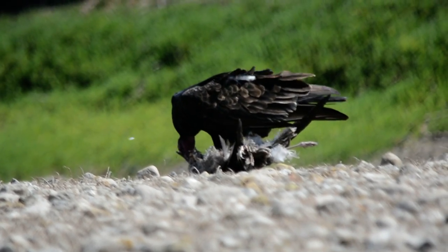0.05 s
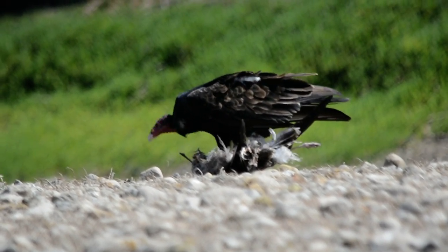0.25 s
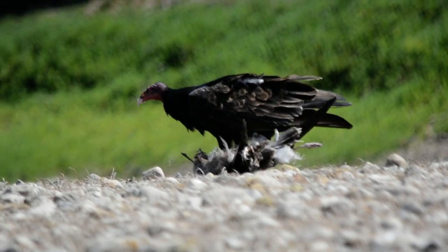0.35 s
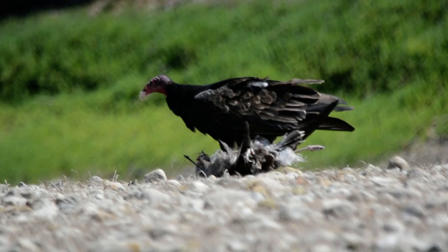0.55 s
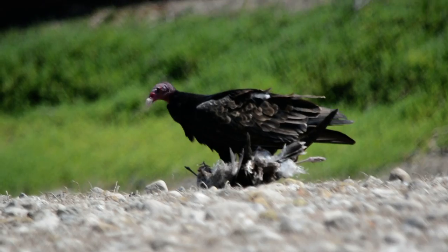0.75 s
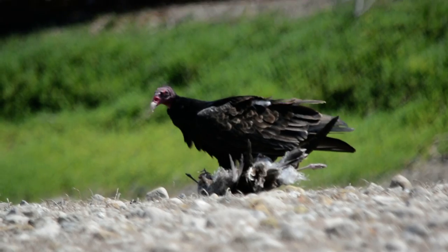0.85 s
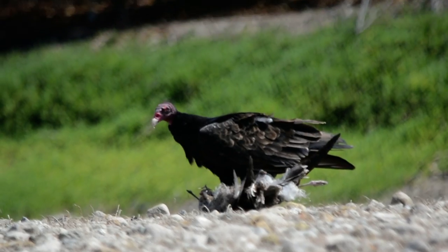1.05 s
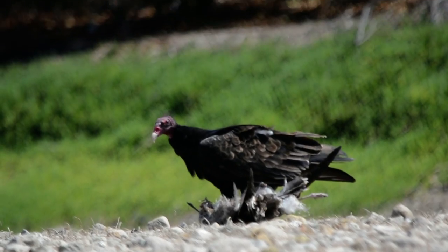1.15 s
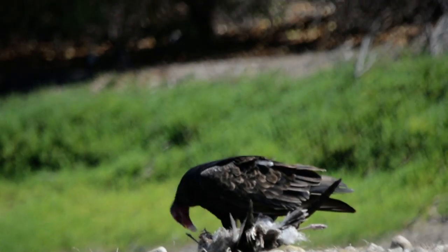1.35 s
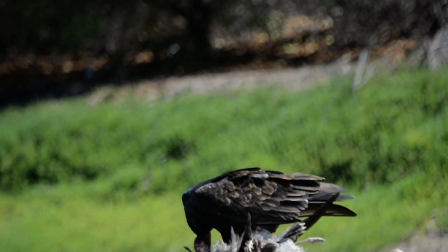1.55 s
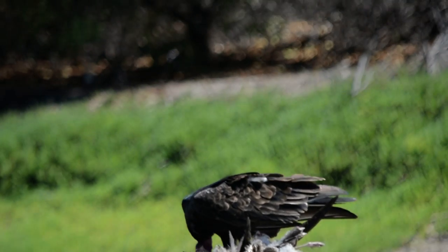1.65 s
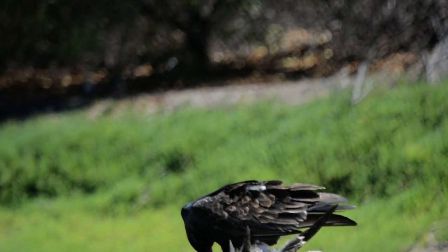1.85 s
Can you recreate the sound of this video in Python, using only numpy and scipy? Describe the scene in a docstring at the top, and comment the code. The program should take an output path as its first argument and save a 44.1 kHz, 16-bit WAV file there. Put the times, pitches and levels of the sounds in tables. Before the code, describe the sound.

Outdoors in the open, a nearby bird squawks harshly as a light gust brushes the microphone. After a pause it lets out a high whistling squeal that cracks twice and grows louder, over a steady rumble of wind or surf.

```python
"""A bird near the microphone gives one harsh rattling squawk, then a long thin squeal, outdoors by water.
The squawk is uneven membrane pulses ringing throat and bill. The squeal is a wavering whistle that
cracks twice into two voices, swells, and closes with a few rasping pulses and a faint after-whistle.
Open ground returns a faint tail, a far bank echoes the squawk. Distant surf or wind rumbles
underneath, and a gust brushes the microphone at first."""
import sys
import numpy as np
from scipy import signal
from scipy.fft import rfft, irfft
from scipy.io import wavfile
from scipy.ndimage import uniform_filter1d

SR = 44100
rng = np.random.default_rng(int(sys.argv[2]) if len(sys.argv) > 2 else 0)


def materialize(psi):
    """Save the field psi as 16-bit PCM at rate SR to the path in sys.argv[1].

    A 1-D psi becomes a single channel; in a 2-D psi each row is a channel.
    """
    bounded = np.clip(np.atleast_2d(psi).T, -1, 1)
    quanta = np.round(bounded * 32767).astype(np.int16)
    wavfile.write(sys.argv[1], SR, quanta)


N = 83790
T = np.arange(N) / SR

# Rumble spectrum: freq_hz, relative_db
RUMBLE_SPECTRUM = [(25, -33), (40, -36), (60, -11), (105, -4.5), (200, -1.5), (330, -2), (490, -5),
                   (800, 0), (1150, -4.5), (1600, -9.5), (2000, -17), (2600, -21), (4000, -30), (5500, -37),
                   (8000, -42), (12000, -49), (15500, -59)]
# Rumble stereo width: freq_hz, side_to_mid_db
RUMBLE_WIDTH = [(30, -45.5), (130, -55), (260, -33), (480, -21.5), (950, -21.5), (1900, -12.5),
                (3800, -6.5), (7500, -2.5), (15000, -2)]
# Gust envelope: time_s, level_db
GUST_LEVEL = [(0, -59), (.045, -43), (.068, -50), (.097, -32.5), (.13, -42), (.16, -50), (.185, -39),
              (.22, -59), (.44, -55), (.5, -83)]
# Outdoor tail decay: freq_hz, t60_s
TAIL_DECAY = [(500, .8), (2000, 1), (4000, 1), (8000, 0.35), (14000, 0.37)]
# Fixed response of throat and bill: freq_hz, relative_db
THROAT_RESPONSE = [(200, -52), (800, -23), (1250, -13), (1600, 0.5), (2000, 3.5), (2420, 1.5), (2780, 0.5),
                   (3020, -13.5), (3240, -2), (3480, -15), (3700, -6), (4100, -7), (4560, -10.5),
                   (5000, -26.5), (6000, -28.5), (7000, -31), (7400, -32), (8400, -26), (9300, -35),
                   (10700, -33.5), (12000, -40), (12800, -48), (15500, -57)]
# Squawk envelope: time_s, level_db
SQUAWK_LEVEL = [(.145, -66), (0.166, -40.5), (.182, -32), (.21, -29.5), (.25, -25.5), (.3, -26),
                (.345, -26), (.375, -21.5), (.41, -17.5), (.44, -17), (0.479, -22.5), (.495, -27.5),
                (.512, -46)]
# Membrane rate and moving throat resonance: time_s, rate_hz, resonance_hz, gain_db
SQUAWK_GLIDE = [(.15, 184, 2460, -9), (.3, 171.3, 2480, -8), (.36, 172, 2020, -6), (.41, 205, 2070, -5),
                (.45, 230, 1790, 3.5), (.51, 200, 1620, 6.5)]
# Squawk roughness: time_s, strong_weak_swing_db, added_hiss_and_flap_db
SQUAWK_ROUGHNESS = [(.15, 2, -4), (.215, 3.5, -4), (.25, .5, -1), (.28, 0.5, -0.5), (.32, 1, 6.5),
                    (.35, 0, -2.5), (.385, 0.5, 5.5), (.43, -0.5, 7.5), (.47, 0, 2), (.51, 2, 0)]
# Bill resonance, sinking as the bill closes: time_s, lowest_mode_hz, gain_db
BILL_GLIDE = [(.15, 6700, 5), (.255, 6060, 5.5), (.33, 7250, -5), (.395, 6600, -1), (.42, 5650, 1.5),
              (.45, 5100, -5), (.51, 4800, -11)]
# Bill modes: ratio_to_lowest, gain_db
BILL_RESONANCES = [(1, -1.5), (1.5, -4), (2.06, -6)]
# Squeal melody: time_s, pitch_hz
SQUEAL_PITCH = [(.9, 2620), (.96, 2830), (.98, 3020), (.991, 2990), (1.01, 3170), (1.06, 3225),
                (1.115, 3020), (1.135, 3135), (1.172, 3130), (1.195, 2840), (1.22, 3200), (1.27, 3160),
                (1.306, 3410), (1.32, 3850), (1.35, 3760), (1.37, 3560), (1.378, 3300), (1.403, 3290),
                (1.42, 3210), (1.437, 3300), (1.48, 3180), (1.515, 3410), (1.54, 3490), (1.548, 3760),
                (1.56, 3740), (1.569, 3390), (1.583, 3375), (1.598, 3435), (1.625, 3350), (1.641, 3240),
                (1.656, 2880)]
# Squeal harmonics: time_s, first_db, second_db, third_db
SQUEAL_LEVELS = [(0.897, -54, -85, -98), (0.916, -45.5, -73, -90), (.96, -42, -71, -70),
                 (.993, -44.5, -61, -60), (1.012, -42, -47.5, -53.5), (1.06, -41.5, -44.5, -52.5),
                 (1.105, -42.5, -54.5, -58), (1.145, -43.5, -50.5, -57), (1.193, -43.5, -57, -59.5),
                 (1.22, -45.5, -47.5, -55), (1.3, -43, -58.5, -61), (1.385, -39.5, -53, -68),
                 (1.44, -40.5, -54.5, -72), (1.48, -39.5, -51.5, -59), (1.53, -40.5, -51.5, -77),
                 (1.563, -30, -45, -60), (1.572, -31.5, -36.5, -49.5), (1.6, -26.5, -32.5, -39.5),
                 (1.628, -26.5, -32, -46), (1.642, -29.5, -35, -51), (1.658, -43, -60, -79)]
# Second voice in each crack: start_s, end_s, top_hz, level_db, roughness
VOICE_CRACKS = [(1.316, 1.373, 4284, -44.5, .12), (1.543, 1.564, 4420, -44.5, 0.65)]
# Closing flaps: start_s, level_db
CLOSING_FLAPS = [(1.6563, -28), (1.6634, -32), (1.669, -36.5)]
# After-whistle: time_s, pitch_hz, level_db
AFTER_WHISTLE = [(1.665, 3320, -72), (1.705, 3195, -55), (1.755, 3200, -63), (1.785, 3490, -58),
                 (1.81, 3400, -62), (1.855, 3400, -60), (1.9, 3290, -56)]


def amp(db):
    """Decibels to gain."""
    return 10 ** (np.asarray(db) / 20)


def unit_rms(x):
    """Scale to rms 1."""
    return x / np.sqrt(np.mean(x ** 2) + 1e-20)


def at_freq(table, hz):
    """Interpolate a table over log frequency."""
    freq_hz, value = np.transpose(table)
    return np.interp(np.log(hz + 1), np.log(freq_hz + 1), value)


def curves(table):
    """Columns of a time table, per sample."""
    time_s, *columns = np.transpose(table)
    return [np.interp(T, time_s, column) for column in columns]


def gate(start_s, end_s, edge_s=.0034):
    """Gate with linear edges."""
    return np.clip(np.minimum(T - start_s, end_s - T) / edge_s + .5, 0, 1)


def wander(corner_hz):
    """Low-passed noise, rms 1."""
    hz = np.fft.rfftfreq(N, 1 / SR)
    return unit_rms(irfft(rfft(rng.standard_normal(N)) / (1 + (hz / corner_hz) ** 2), N))


def resonate(x, hz, width_hz):
    """Moving resonance, unity gain."""
    carrier = np.exp(2j * np.pi * np.cumsum(hz) / SR)
    pole = np.exp(-np.pi * width_hz / SR)
    return 2 * (carrier * signal.lfilter([1 - pole], [1, -pole], x / carrier + 1e-18)).real


def resonate_twice(x, hz, width_hz):
    """Cascaded resonance, steeper skirts."""
    return resonate(resonate(x, hz, width_hz), hz, width_hz)


def rumble(level_db=-36.5, pan_db=.5, patch_db=.3):
    """Distant surf or wind: dark noise with faint drifting patches, narrow in the bass, wider on top."""
    frames, hz = N // 512 + 6, np.fft.rfftfreq(2048, 1 / SR)
    mid_re, mid_im, side_re, side_im, patches = rng.standard_normal((frames, len(hz), 5)).T
    patches = uniform_filter1d(patches, size=14, axis=0)
    patches = unit_rms(uniform_filter1d(patches, size=8, axis=1))
    mid = mid_re + 1j * mid_im
    side = (side_re + 1j * side_im) * amp(at_freq(RUMBLE_WIDTH, hz))[:, None]
    shape_db = at_freq(RUMBLE_SPECTRUM, hz)[:, None] + patch_db * patches
    spectra = np.array([mid + side, mid - side]) * amp(shape_db)
    noise = unit_rms(signal.istft(spectra, nperseg=2048, noverlap=1536)[1][:, :N])
    return noise * amp(level_db + pan_db * np.array([[.5], [-.5]]))


def gust(band_hz=(70, 187), right_db=-15):
    """Wind buffets each microphone port independently, mostly the left."""
    level_db, = curves(GUST_LEVEL)
    band = signal.butter(2, band_hz, "bandpass", fs=SR, output="sos")
    buffet = signal.sosfilt(band, rng.standard_normal((2, N)))
    power = uniform_filter1d(buffet ** 2, size=1500, axis=1)
    return buffet / np.sqrt(power + 1e-9) * amp(level_db) * amp([[0], [right_db]])


def far_echo(x, delay_s=.385, smear_s=.024, gain_db=-27, centre_hz=1890):
    """Dull, smeared return from a far bank."""
    t = T[:SR]
    scatter = rng.standard_normal(SR) * (t > delay_s) * np.exp(-abs(t - delay_s) / smear_s)
    echo = signal.fftconvolve(x, scatter / np.linalg.norm(scatter))[:N]
    return amp(gain_db) * resonate(echo, np.full(N, centre_hz), width_hz=700)


def outdoors(x, ground_db=-12.5, ground_decay_s=.0076, tail_db=-26.5, tail_rise_s=.015):
    """Direct sound, quick ground scatter and a faint tail from banks and trees."""
    t = T[:SR]
    hz, frame_s, spectra = signal.stft(rng.standard_normal((2, SR)), SR, nperseg=256)
    decay = amp(-60 * frame_s / at_freq(TAIL_DECAY, hz)[:, None])
    tail = signal.istft(spectra * decay, SR, nperseg=256)[1][:, :SR]
    tail = (tail + .75 * tail[::-1]) * np.minimum(t / tail_rise_s, 1)  # crossfeed narrows the image
    ground = rng.standard_normal(SR) * (t > .001) * np.exp(-t / ground_decay_s)
    response = amp(tail_db) * tail / np.linalg.norm(tail[0])
    response += amp(ground_db) * ground / np.linalg.norm(ground)
    return x + signal.fftconvolve(x, response, axes=1)[:, :N]


def place(x, lag_us, pan_db):
    """Two close microphone ports: delay and level of left against right."""
    delay = np.exp(-2j * np.pi * np.fft.rfftfreq(N, 1 / SR) * lag_us / 1e6)
    return np.array([irfft(rfft(x) * delay, N) * amp(pan_db / 2), x * amp(-pan_db / 2)])


def throat(x):
    """Fixed resonances of throat and bill, minimum phase."""
    hz = abs(np.fft.fftfreq(2048, 1 / SR))
    log_gain = np.log(amp(at_freq(THROAT_RESPONSE, hz)))
    ring = np.fft.ifft(np.exp(np.conj(signal.hilbert(log_gain)))).real
    return signal.oaconvolve(x, ring / abs(ring).max())[:N]


def after_whistle(waver=.008, flutter_db=2.2, octave_db=-13):
    """Faint, unsteady whistle after the squeal."""
    pitch_hz, level_db = curves(AFTER_WHISTLE)
    phase = 2 * np.pi * np.cumsum(pitch_hz * (1 + waver * wander(corner_hz=250))) / SR
    tone = np.sin(phase) + amp(octave_db) * np.sin(2 * phase)
    envelope = amp(level_db + flutter_db * wander(corner_hz=70)) * gate(AFTER_WHISTLE[0][0], end_s=2)
    return np.sqrt(2) * tone * envelope


def closing_rasp(decay_s=.001, cutoff_hz=6000):
    """Last dull membrane flaps as the squeal stops."""
    flaps = sum(amp(db) * (T >= s) * np.exp(-abs(T - s) / decay_s) for s, db in CLOSING_FLAPS)
    air = rng.standard_normal(N)
    rasp = throat(flaps * air) / np.std(throat(air))
    return signal.sosfilt(signal.butter(2, cutoff_hz, fs=SR, output="sos"), rasp)


def second_voice(main_phase, edge_s, sag=.035, rough_waver=.05, octave_db=-14, sum_tone_db=-17):
    """A higher, arching voice in each crack, with its octave and a sum tone with the main voice."""
    voice = np.zeros(N)
    for start_s, end_s, top_hz, level_db, roughness in VOICE_CRACKS:
        past_top = (T - start_s) / (end_s - start_s) - .35
        arch = 1 - sag * np.minimum(past_top ** 2 / .39, 1)
        pitch_hz = top_hz * (arch + rough_waver * roughness * wander(corner_hz=506))
        phase = 2 * np.pi * np.cumsum(pitch_hz) / SR
        tone = np.sin(phase) + amp(octave_db) * np.sin(2 * phase)
        tone += amp(sum_tone_db) * np.sin(phase + main_phase)
        voice += amp(level_db) * gate(start_s, end_s, edge_s) * tone
    return voice


def squeal(waver=.0042, flutter_db=1, steady_above_db=-34, air_db=-26):
    """Breathy four-harmonic whistle; steadies when loud, dips at each crack under a second voice."""
    crack_edge_s, crack_dip_db, crack_waver = .005, -10, .018
    pitch_hz, = curves(SQUEAL_PITCH)
    first_db, second_db, third_db = curves(SQUEAL_LEVELS)
    fourth_db = third_db - 17
    cracked = sum(gate(start_s, end_s, crack_edge_s) for start_s, end_s, *_ in VOICE_CRACKS)
    unsteady = amp(-np.maximum(first_db - steady_above_db, 0))
    detune = waver * unsteady * wander(corner_hz=160) + crack_waver * cracked * wander(corner_hz=500)
    pitch_hz = uniform_filter1d(pitch_hz, size=220) * (1 + detune)
    phase = 2 * np.pi * np.cumsum(pitch_hz) / SR
    voice = np.zeros(N)
    for k, level_db in enumerate([first_db, second_db, third_db, fourth_db], 1):
        flicker_db = flutter_db * unsteady * np.sqrt(k) * wander(corner_hz=70)
        voice += amp(level_db + flicker_db) * np.sin(k * phase)
    voice = voice * amp(crack_dip_db * cracked) + second_voice(phase, crack_edge_s)
    air = resonate(rng.standard_normal(N), pitch_hz, width_hz=580)
    air += .5 * resonate(rng.standard_normal(N), 2 * pitch_hz, width_hz=1500)
    whistle = np.sqrt(2) * voice + amp(first_db + air_db) * unit_rms(air)
    return whistle * gate(SQUEAL_LEVELS[0][0], SQUEAL_LEVELS[-1][0])


def membrane(rate_hz, jitter=.085, shimmer_db=1.6, hiss_db=-10.5, puff_decay_s=.0012):
    """Uneven pulses, alternately strong and weak, each with a second flap and a puff of air."""
    flap_db, flap_spread_db, flap_from_cycle, flap_span_cycle = -7, 4, .12, .48
    swing_db, rough_db = curves(SQUAWK_ROUGHNESS)
    pulses, time_s, swing_sign = np.zeros(N), SQUAWK_LEVEL[0][0], 1
    for (gap, size, flap_size), lateness in zip(rng.standard_normal((100, 3)), rng.random(100)):
        onset = int(time_s * SR)
        period_s = 1 / rate_hz[onset]
        pulses[onset] += amp(shimmer_db * size + swing_sign * swing_db[onset])
        flap_s = time_s + period_s * (flap_from_cycle + lateness * flap_span_cycle)
        pulses[int(flap_s * SR)] += amp(min(flap_db + rough_db[onset] + flap_spread_db * flap_size, 0))
        swing_sign = -swing_sign
        time_s += period_s * (1 + jitter * gap)
    airflow = signal.lfilter([1], [1, -np.exp(-1 / (puff_decay_s * SR))], pulses)
    puffs = airflow * rng.standard_normal(N)
    return amp(hiss_db + rough_db) * unit_rms(puffs) - unit_rms(pulses)


def squawk(throat_width_hz=630, bill_width_hz=800):
    """Membrane pulses ring throat and bill, whose resonances sink."""
    level_db, = curves(SQUAWK_LEVEL)
    rate_hz, throat_hz, throat_db = curves(SQUAWK_GLIDE)
    bill_hz, bill_db = curves(BILL_GLIDE)
    voice = throat(membrane(rate_hz))
    throat_ring = resonate_twice(voice, throat_hz, throat_width_hz)
    bill_ring = sum(amp(db) * resonate_twice(voice, ratio * bill_hz, bill_width_hz)
                    for ratio, db in BILL_RESONANCES)
    voice = voice + amp(throat_db) * throat_ring + amp(bill_db) * bill_ring
    power = uniform_filter1d(uniform_filter1d(voice ** 2, size=640), size=480)
    envelope = amp(level_db) * gate(SQUAWK_LEVEL[0][0], SQUAWK_LEVEL[-1][0])
    return voice / np.sqrt(abs(power) + 1e-6) * envelope


def scene():
    """The bird in the open, over rumble and gust."""
    harsh = squawk()
    thin = squeal() + closing_rasp() + after_whistle()
    bird = place(harsh, lag_us=7.1, pan_db=-.2) + place(thin, lag_us=22.8, pan_db=-.5)
    return outdoors(bird) + far_echo(harsh) + rumble() + gust()


def record(dry):
    """Recorder band limit."""
    cutoff_hz = 15800
    lowpass = signal.firwin(511, cutoff_hz, window=("kaiser", 9), fs=SR)
    return signal.oaconvolve(dry, lowpass[None], "same")


dry = scene()
out = record(dry)
materialize(out)
```